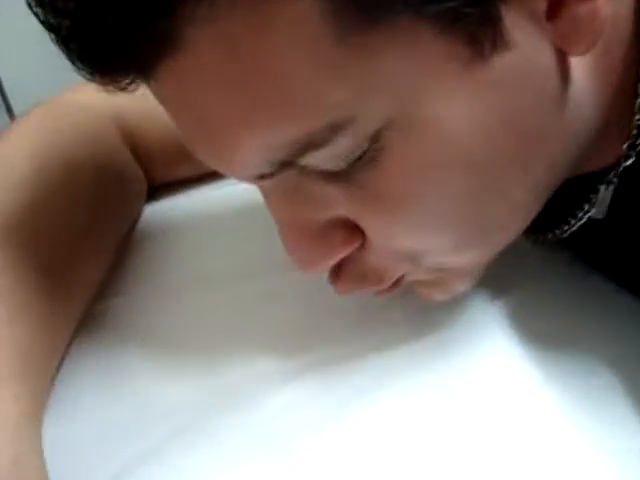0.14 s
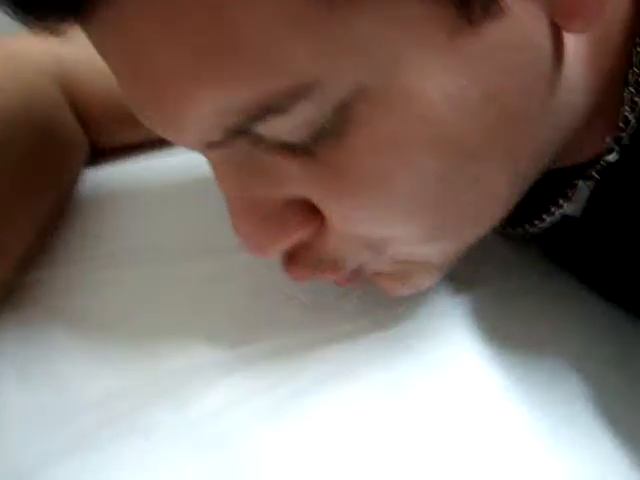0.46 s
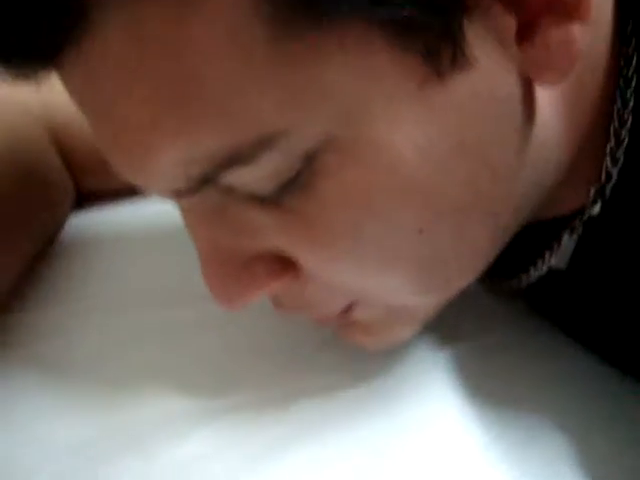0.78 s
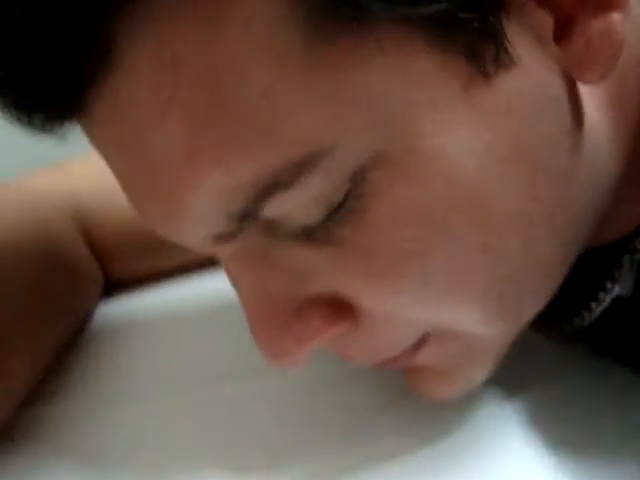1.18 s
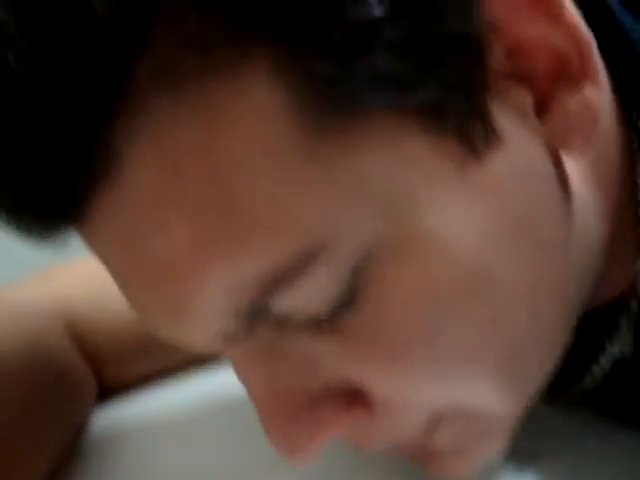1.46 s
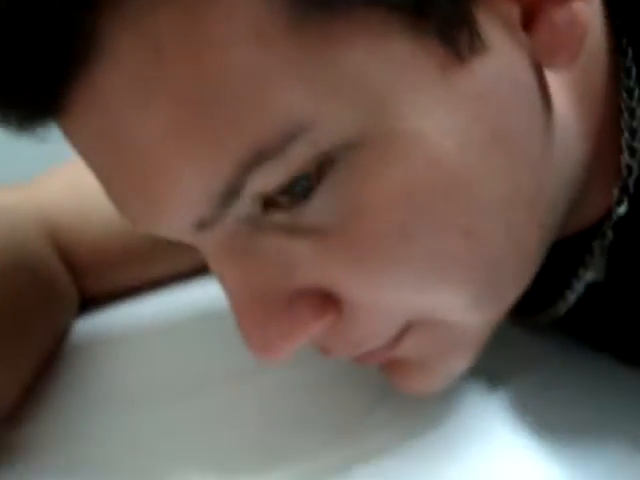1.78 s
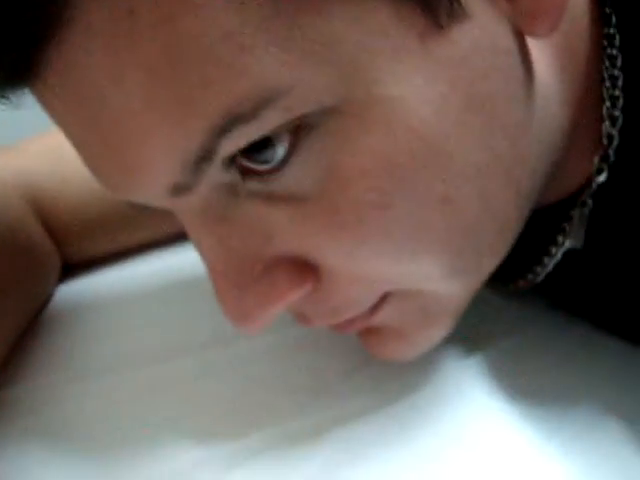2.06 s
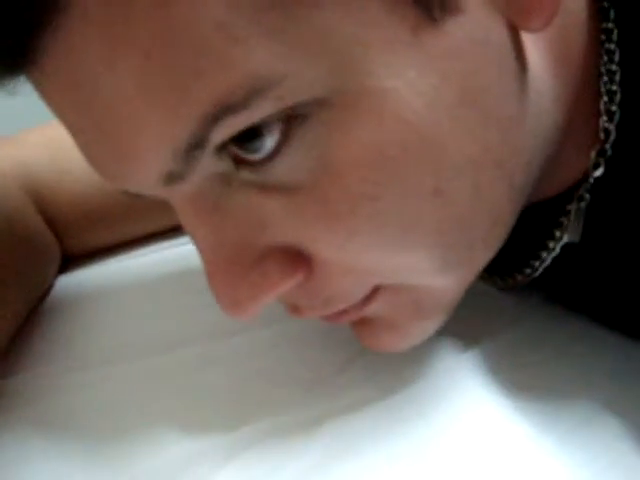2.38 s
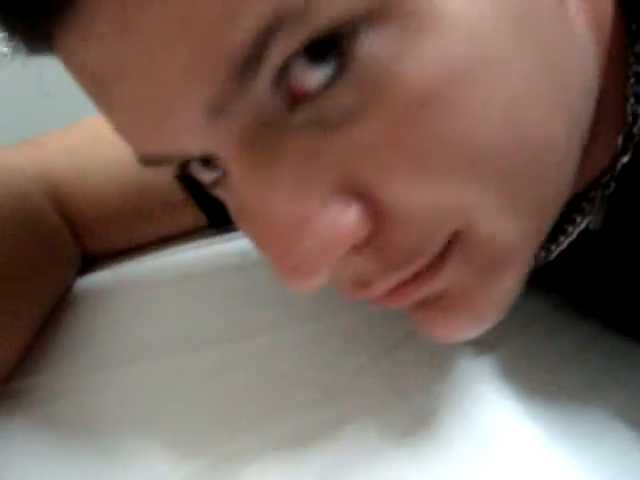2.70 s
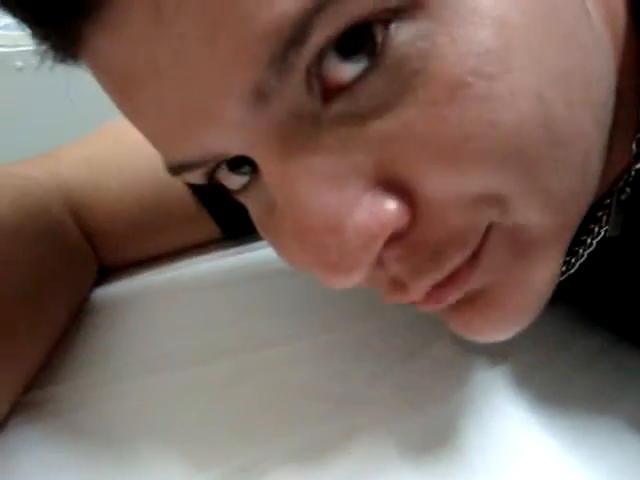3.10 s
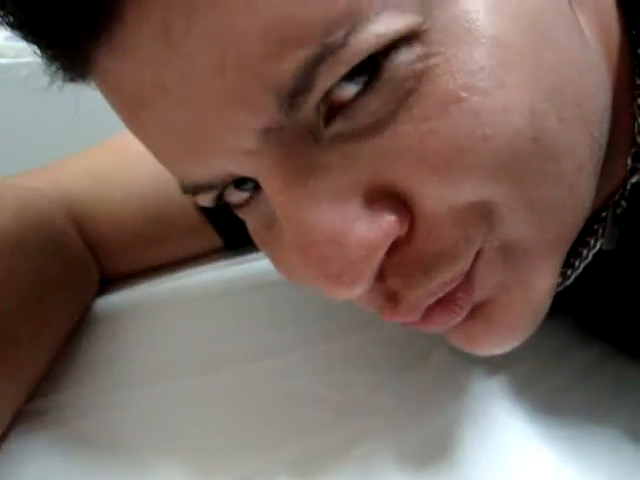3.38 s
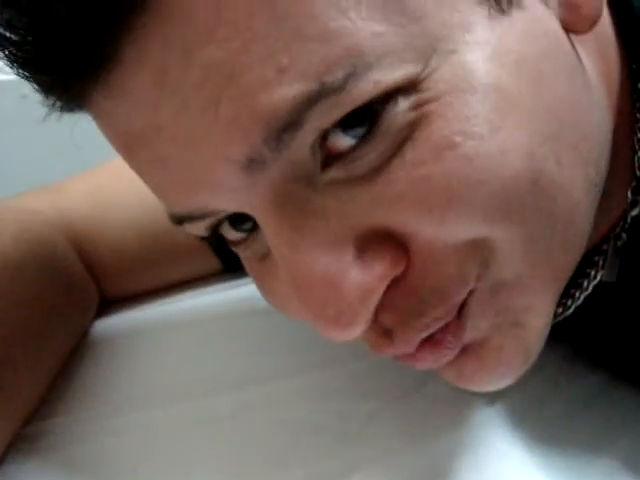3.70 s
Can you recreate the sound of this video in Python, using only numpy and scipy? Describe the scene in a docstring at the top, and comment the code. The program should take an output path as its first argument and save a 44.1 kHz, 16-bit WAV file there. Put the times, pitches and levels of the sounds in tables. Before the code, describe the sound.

Metallic tattoo machine buzz with four quick stops, over faint distant dog yaps.

```python
"""Close to the microphone, in a small hard-walled room, a coil tattoo machine is already buzzing:
its armature strikes about 107 times a second, ringing spring and frame and rattling loose parts.
Almost at once a dog starts yapping faintly, far away. Between 0.7 and 2 s the machine stops briefly
four times while the room rings on; a low thump comes with the first three restarts. Then it runs
without a break, the dog falls silent, and the bare knock of the armature grows to the end."""
import sys
import numpy as np
from scipy import signal
from scipy.fft import rfft, irfft, next_fast_len
from scipy.io import wavfile

SR = 44100
rng = np.random.default_rng(int(sys.argv[2]) if len(sys.argv) > 2 else 0)


def digitize_waveform(pressure):
    """Quantize a signal to 16-bit integers and store it at the path in sys.argv[1].

    Rows of a 2-D input are taken as channels; values are limited to [-1, 1].
    """
    field = np.atleast_2d(pressure).T
    bounded = np.clip(field, -1, 1)
    quanta = np.round(bounded * 32767).astype(np.int16)
    wavfile.write(sys.argv[1], SR, quanta)


N = 169785
T = np.arange(N) / SR

# speed of the armature: t/s, blow rate/Hz
BLOW_RATE = [(0.0, 105.6), (0.35, 105.7), (0.63, 107.2), (0.8, 106.8), (0.82, 103.4), (0.89, 106.4),
             (1.09, 103.7), (1.14, 106.6), (1.26, 107.4), (1.58, 106.7), (1.64, 107.4), (2.81, 107.3),
             (3.16, 106.3), (3.85, 106.3)]
# balance of the parts, before the trims in machine(): t/s, spring/dB, frame/dB, clack/dB
PART_LEVELS = [(0, -39, -43, -33), (.46, -46.5, -40.5, -33), (.63, -52, -36.5, -30), (.71, -47, -44, -36.5),
               (.85, -44, -38.5, -32.5), (.94, -63, -47, -41), (1.12, -49, -42, -32),
               (1.28, -47.5, -44, -35), (1.56, -44.5, -42.5, -33), (1.66, -50.5, -44, -36),
               (1.91, -46, -42, -33), (2.03, -49.5, -41.5, -32.5), (2.17, -44.5, -37.5, -34.5),
               (2.45, -50, -49.5, -30), (2.62, -44, -39.5, -29.5), (2.83, -44, -41.5, -28),
               (2.88, -53, -45, -32.5), (3.1, -51, -38, -30), (3.82, -48.5, -42, -34)]
# resonances of the spring and of the frame: f/Hz, width/Hz, relative level/dB
SPRING_MODES = [(1931, 85, -8), (2061, 143, -2), (2256, 78, -3.5)]
FRAME_MODES = [(2900, 204, -2.5), (3180, 160, -8.5), (3940, 218, -6.5), (4530, 137, 4), (5320, 360, -5.5)]
# spectrum of the buzz underneath: f/Hz, relative level/dB
BUZZ_SPECTRUM = [(70, -21), (107, -10), (215, -12), (430, -13.5), (640, -15), (850, -10.5), (1080, 3),
                 (1400, 0.5), (1650, 5), (2600, -0.5), (3600, 8), (5000, -36)]
def machine():
    """Armature blows ring spring and frame into the room; knock, free rings and thumps arrive dry."""
    blow_rate, = in_time(BLOW_RATE)
    cycles = np.cumsum(blow_rate) / SR
    spring_db, frame_db, clack_db = in_time(PART_LEVELS)
    strike = blows(cycles)
    scuffs = ring_on(strike, tail_db=2.5, t60=0.024)  # each contact is a tiny scuff
    body = (from_db(spring_db - 1) * resonate(strike, SPRING_MODES)
            + from_db(frame_db - .5) * resonate(scuffs, FRAME_MODES)
            + from_db(clack_db + 2.5) * clack(scuffs, cycles)
            + from_db(-53) * colour(ring_on(strike, tail_db=-1.5, t60=0.072), BUZZ_SPECTRUM))
    close = knock(strike, cycles) + free_rings(strike)
    gate = running()
    return room(gate * body) + gate * close + coil_thumps(strike)


# pauses of the machine: stop t/s, restart t/s
PAUSES = [(.73, .828), (.955, 1.092), (1.425, 1.541), (1.93, 1.995)]
START_S, STOP_S = .027, .025
def running():
    """The armature's swing, 0 to 1: it dies at each stop and returns at the restart."""
    return 1 - sum(np.clip((T - stop) / STOP_S + .5, 0, 1) * np.clip((start - T) / START_S + .5, 0, 1)
                   for stop, start in PAUSES)


def blows(cycles, jitter_s=5e-6, start_jitter_s=4e-5, settle_s=0.086, spread_db=0.84):
    """One click per cycle, slightly uneven in time and strength; the timing is shakier after a restart."""
    chance = rng.standard_normal((SR // 10, 2))[:int(cycles[-1])]
    due = np.interp(np.arange(len(chance)), cycles, T)
    since_start = np.min([np.where(T > s - START_S, np.abs(T - s), 10) for _, s in PAUSES], axis=0)
    jitter = jitter_s + start_jitter_s * np.exp(-np.interp(due, T, since_start) / settle_s)
    at = (due + jitter * chance[:, 0]) * SR
    taps = at.astype(int)[:, None] + np.arange(-8, 9)
    late = taps - at[:, None]
    clicks = np.sinc(late) * np.sinc(late / 9)  # a blow can fall between samples
    out = np.zeros(N)
    np.add.at(out, np.clip(taps, 0, N - 1), clicks * from_db(spread_db * chance[:, 1:]))
    return out


# spectrum of the treble clack: f/Hz, relative level/dB
CLACK_SPECTRUM = [(3500, -28.5), (4800, -8), (5500, -10.5), (5950, -9.5), (6400, -5), (6750, -1.5),
                  (7400, -2.5), (8050, -5.5), (9100, -6), (9600, -3.5), (10100, -7)]
def clack(scuffs, cycles, fade_cycles=0.33):
    """Small parts ring densely after each blow, and loose ones rattle anew in every cycle."""
    rattle = rms_one(rng.standard_normal(N) * np.exp(-(cycles % 1) / fade_cycles))
    chatter = rms_one(ring_on(scuffs, tail_db=-4, t60=0.041))
    return colour(chatter + from_db(-3) * rattle, CLACK_SPECTRUM)


# the knock at the microphone, growing as the needle runs freer: t/s, level/dB
KNOCK_LEVELS = [(0, -42), (1.97, -44.5), (2.13, -33.5), (2.9, -37), (3.82, -28)]
# resonances of the knock: f/Hz, width/Hz, relative level/dB
KNOCK_MODES = [(7150, 540, -2.5), (9660, 410, -4)]
def knock(strike, cycles, rebound_cycles=0.7, band_width_hz=3000):
    """The bare metal knock of each blow, and a weaker, less regular one as the armature swings back."""
    level_db, = in_time(KNOCK_LEVELS)
    rebound = from_db(-6 + 5 * drift(rate_hz=40)) * blows(cycles - rebound_cycles)
    metal = resonate(strike + rebound, KNOCK_MODES)
    return from_db(level_db) * resonate(metal, [(KNOCK_MODES[0][0], band_width_hz, 0)])


# resonances freed as the grip shifts: from t/s, to t/s, f/Hz, width/Hz, level/dB
FREE_RINGS = [(0, 0.417, 2194, 90, -47), (0, 0.454, 2860, 70, -52), (0, .42, 4670, 130, -43),
              (0.51, 0.735, 2293, 50, -53.5), (0.557, .73, 2760, 110, -50), (.8, 0.89, 2120, 150, -49),
              (1.227, 1.427, 2850, 80, -48.5), (2.072, 2.346, 2210, 24, -43.5),
              (2.098, 3.092, 4290, 220, -45), (2.16, 2.68, 3470, 140, -64), (2.572, 2.828, 6570, 100, -39),
              (2.867, 4, 2265, 30, -65), (2.95, 4.002, 1696, 70, -61.5), (3.096, 4, 4392, 150, -37.5),
              (3.097, 4, 3960, 150, -53), (3.088, 4, 2884, 130, -51.5)]
def free_rings(strike, open_s=0.029, close_s=0.12):
    """Single resonances that the blows keep ringing while the hand leaves them undamped."""
    out = np.zeros(N)
    for begin, end, hz, width, db in FREE_RINGS:
        undamped = np.clip(np.minimum((T - begin) / open_s, (end - T) / close_s) + .5, 0, 1)
        out += from_db(db) * undamped * resonate(strike, [(hz, width, 0)])
    return out


# thumps of the coils: t/s, length/s, level/dB
THUMPS = [(0.843, 0.069, -57.5), (1.088, 0.13, -64.5), (1.53, 0.17, -63.5)]
def coil_thumps(strike, band_hz=(70, 400)):
    """The coils thump low as the machine starts again."""
    swell = sum(from_db(db) * np.clip(np.minimum(T - s, s + length - T) / START_S, 0, 1)
                for s, length, db in THUMPS)
    hum = signal.sosfilt(signal.butter(1, band_hz, "band", fs=SR, output="sos"), strike)
    return swell * rms_one(hum)


ROOM_T60_S = 0.49
def room(x, wet_db=3.5, build_s=0.0052, turns_per_s=0.398):
    """Hard walls close by add a dense tail whose peaks and notches slide as the hand moves the machine."""
    t = T[:SR]
    tails = rng.standard_normal((2, SR)) * from_db(-60 * t / ROOM_T60_S) * (1 - np.exp(-t / build_s))
    turn = turns_per_s * 2 * np.pi * T
    wet = sum(signal.fftconvolve(x * share, tail / np.linalg.norm(tail))[:N]
              for share, tail in zip((np.cos(turn), np.sin(turn)), tails))
    return (x + from_db(wet_db) * wet) / np.hypot(1, from_db(wet_db))


# yaps far from the microphone: t/s, voice level/dB, f/Hz
YAPS = [(0.136, -58.5, 667), (0.797, -51, 842), (1.055, -45.5, 868), (1.329, -52.5, 906),
        (1.836, -56.5, 916), (1.972, -51.5, 848), (2.356, -64, 883)]
def dog(yap_s=0.0555, rise=0.15, width_oct=0.21, mouth_hz=2040, mouth_width_hz=410):
    """Short hoarse yaps that rise in pitch, with a rasp in the mouth's resonance, blurred by distance."""
    out = np.zeros(N)
    mouth = [(mouth_hz, mouth_width_hz, 0)]
    rasp = from_db(-2.5) * resonate(resonate(rng.standard_normal(N), mouth), mouth)
    for s, db, hz in YAPS:
        age = np.clip((T - s) / yap_s, 0, 1)
        lowpass = signal.butter(2, hz * width_oct * np.log(2), fs=SR, output="sos")
        hoarse = signal.sosfilt(lowpass, rng.standard_normal((2, N)))
        phase = 2 * np.pi * np.cumsum(hz * (1 + rise * (age - .5))) / SR
        voice = rms_one(hoarse[0] * np.cos(phase) + hoarse[1] * np.sin(phase))
        out += from_db(db) * np.sin(np.pi * age) * (voice + rasp)
    return ring_on(out, tail_db=-2.5, t60=ROOM_T60_S)


# spectrum of the room tone: f/Hz, relative level/dB
AIR_SPECTRUM = [(25, -9.5), (60, -11), (300, 0), (500, -3), (900, 3), (4000, 2), (10000, -42)]
def room_tone():
    """The faint, steady hiss of the air around the microphone."""
    return from_db(-55) * colour(rng.standard_normal(N), AIR_SPECTRUM)


def from_db(db):
    """Decibels to gain."""
    return 10 ** (np.asarray(db) / 20)


def rms_one(x):
    """Scale to unit rms."""
    return x / np.sqrt(np.mean(x ** 2) + 1e-20)


def in_time(rows):
    """Each column of a curve at every sample."""
    s, *columns = np.transpose(rows)
    return [np.interp(T, s, c) for c in columns]


def drift(rate_hz):
    """Slow random wander between -1.1 and 1."""
    knots = rng.uniform(-1.1, 1, SR // 10)
    return np.interp(T * rate_hz, np.arange(len(knots)), knots)


def colour(x, points):
    """Filter by a curve of f/Hz, level/dB that falls away beyond its ends; rms 1."""
    hz, db = np.transpose(points)
    size = next_fast_len(N + SR // 10)
    f = np.fft.rfftfreq(size, 1 / SR) + 1
    outside = np.maximum(f / hz[-1], 1) * np.maximum(hz[0] / f, 1)
    gain = from_db(np.interp(np.log(f), np.log(hz), db)) / outside ** 2
    return rms_one(irfft(rfft(x, size) * gain, size)[:N])


def resonate(x, modes):
    """Parallel resonances of alternating sign; rms 1."""
    out = 0
    for k, (hz, width, db) in enumerate(modes):
        r = np.exp(-np.pi * width / SR)
        forward = np.array([1, 0, -1]) * (1 - r * r) / 2
        feedback = [1, -2 * r * np.cos(2 * np.pi * hz / SR), r * r]
        out = out + (-1) ** k * from_db(db) * signal.lfilter(forward, feedback, x)
    return rms_one(out)


def ring_on(x, tail_db, t60, evenness=0.66):
    """The direct sound and a dense dying tail, its peaks and notches evened out, at unchanged power."""
    t = T[:SR]
    tail = rng.standard_normal(SR) * from_db(-60 * t / t60) * (1 - np.exp(-200 * t / t60))
    spectrum = 1 + from_db(tail_db) * rfft(tail / np.linalg.norm(tail), 2 * SR)
    for _ in range(3):
        response = irfft(spectrum / np.hypot(np.abs(spectrum), .5) ** evenness)[:SR]
        spectrum = rfft(response, 2 * SR)
    response = response * np.exp(-(t / t60) ** 2)
    return signal.fftconvolve(x, response / np.linalg.norm(response))[:N]


def scene():
    """One microphone: room tone all around, the machine close by, the dog far off."""
    return (room_tone() + machine() + dog())[None]


def record(dry):
    """The microphone chain eases both ends over 2 ms and cuts the top steeply near 10 kHz."""
    eased = dry * np.clip(np.minimum(T, T[-1] - T) / .002, 0, 1)
    lowpass = signal.firwin(801, 10070, window=("kaiser", 9), fs=SR)
    return signal.fftconvolve(eased, lowpass[None], "same")


dry = scene()
out = record(dry)
digitize_waveform(out)
```